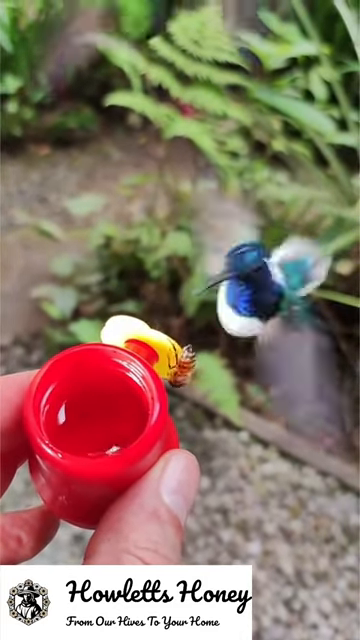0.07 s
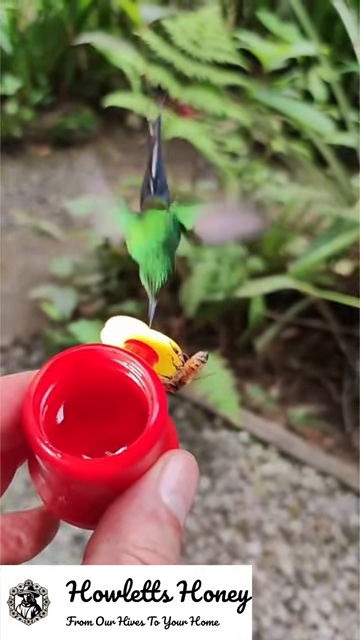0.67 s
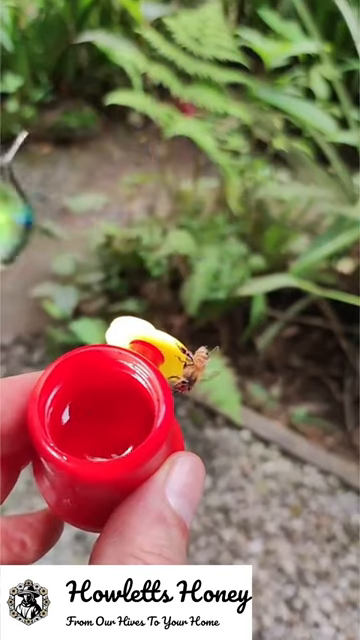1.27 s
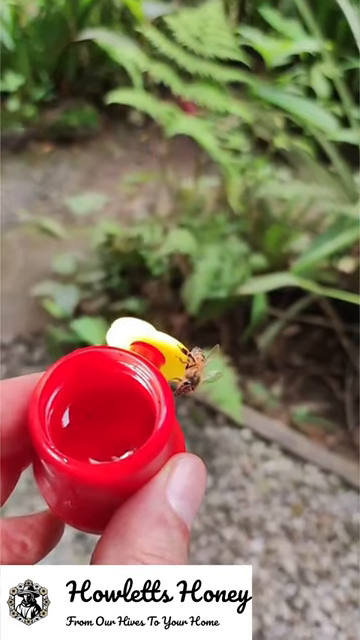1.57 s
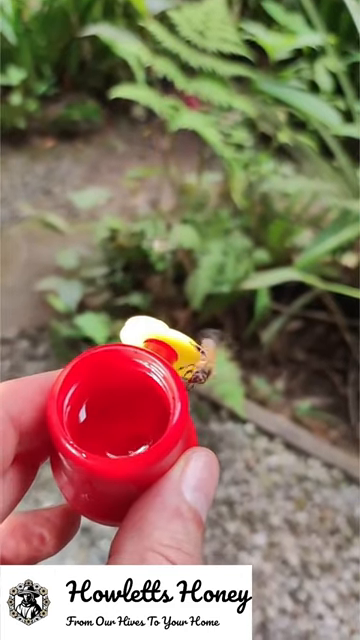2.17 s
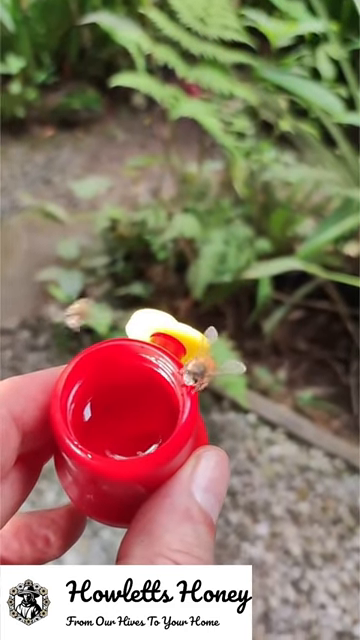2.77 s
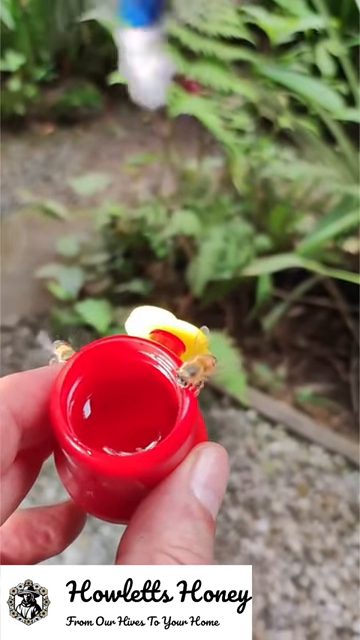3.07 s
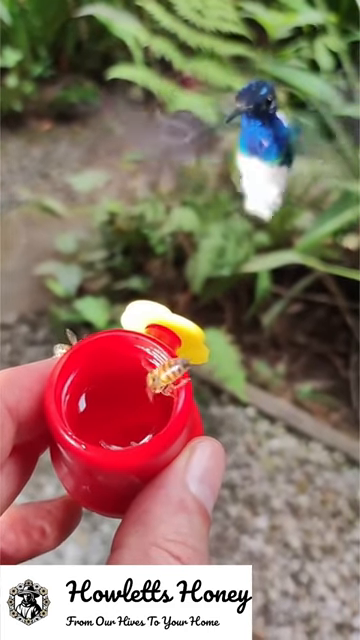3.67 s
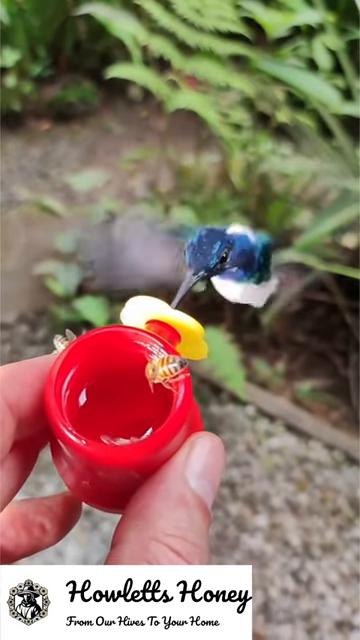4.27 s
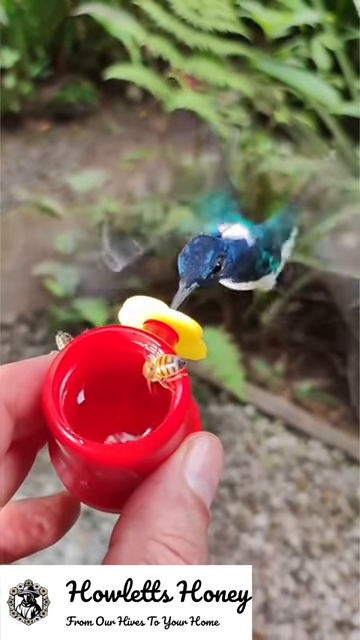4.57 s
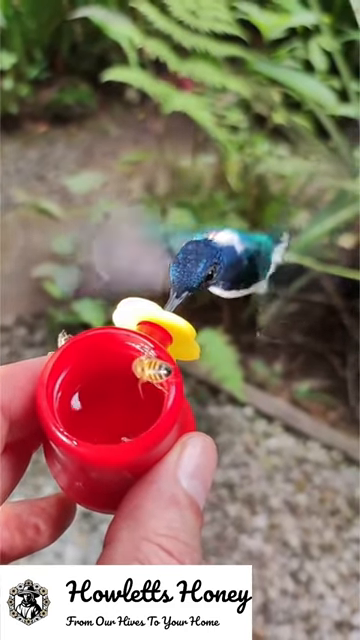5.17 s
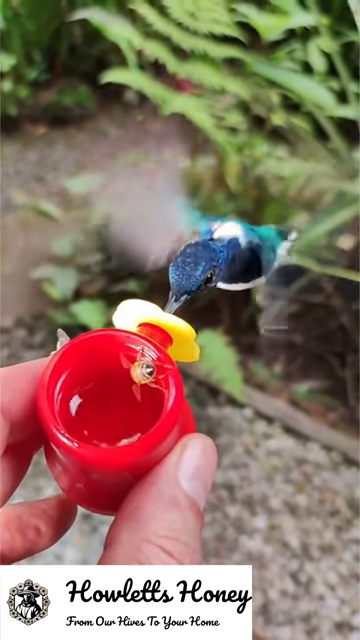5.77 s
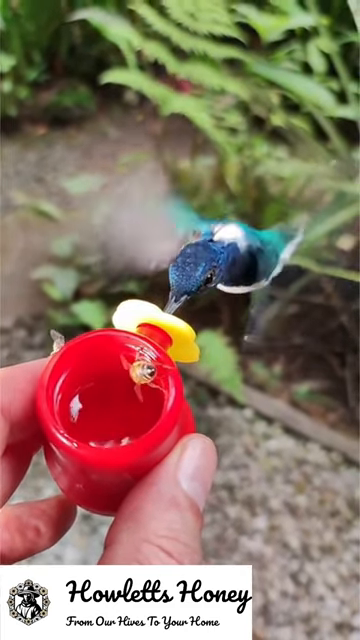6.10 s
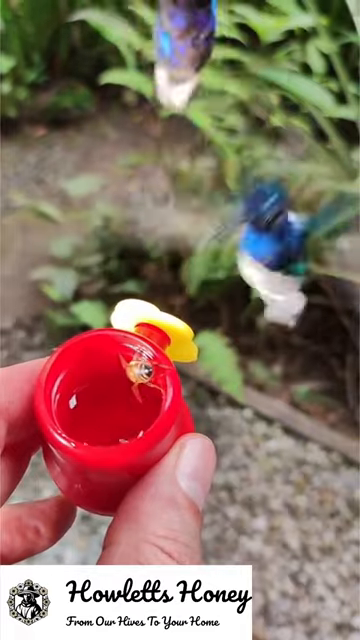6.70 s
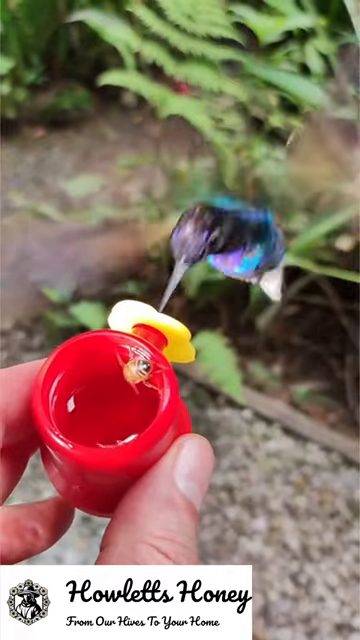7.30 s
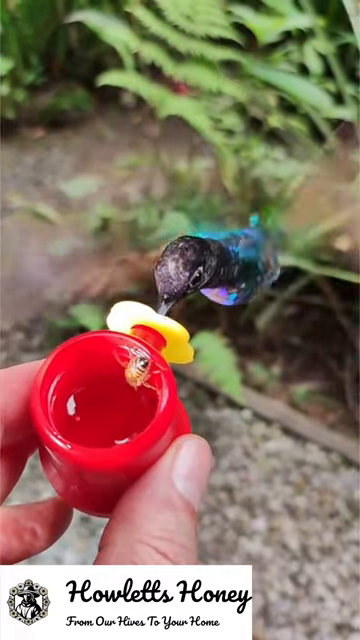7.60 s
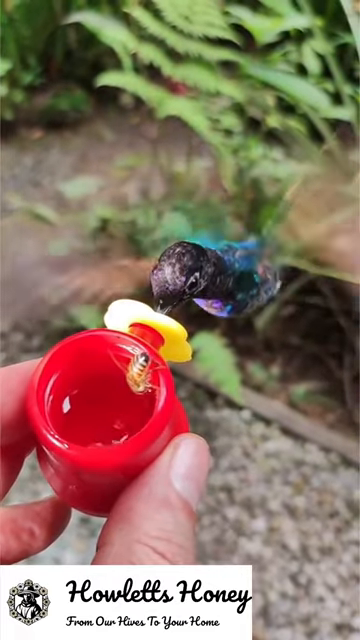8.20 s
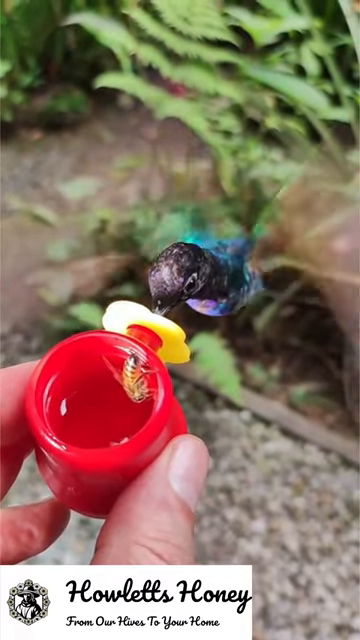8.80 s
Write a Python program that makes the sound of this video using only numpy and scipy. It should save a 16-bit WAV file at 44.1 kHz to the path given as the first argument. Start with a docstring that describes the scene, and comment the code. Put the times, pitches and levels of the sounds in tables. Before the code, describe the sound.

Hummingbirds hum and whir very close, with soft wing thumps, sharp high chips and a faint bee over steady garden noise.

```python
"""Hummingbirds hover in turn at a hand-held garden feeder, a hand's width from the microphone.
Their wing strokes hum and shed eddies; a close swerve throws vortices that thump. The birds chip,
squeak and hiss, feathers and bills snap and rustle, and light taps ring the plastic feeder.
A honeybee buzzes round it and far birds twitter and chatter over the steady wash of the garden.
Leaves and ground give a short echo."""
import sys
import numpy as np
from scipy import signal
from scipy.fft import rfft, irfft, next_fast_len
from scipy.io import wavfile
from scipy.ndimage import uniform_filter1d

SR = 44100
rng = np.random.default_rng(int(sys.argv[2]) if len(sys.argv) > 2 else 0)


def unload_audio(sound):
    """Save the sound as a 16-bit wav file, at the path given as the first command line argument."""
    columns = np.transpose(np.atleast_2d(sound))
    # keep every value between -1 and 1, then stretch to whole-number steps
    steps = np.round(np.clip(columns, -1, 1) * 32767)
    wavfile.write(sys.argv[1], SR, steps.astype(np.int16))


N = 399105
TIME = np.arange(N) / SR


def wings(strokes_hz, gain, harmonics, air_db, hum_gain, jitter, shimmer_db):
    """Unequal up and down strokes hum on the wingbeat. Returns hum and (eddy, swish) envelopes."""
    beat = 2 * np.pi * np.cumsum(strokes_hz / 2 * (1 + jitter * wander(40))) / SR
    hum = sum(amp(db + shimmer_db * wander(25)) * np.cos(k * beat) for k, db in harmonics)
    pulsing = 0.55 * np.cos(beat) + 0.5 * np.cos(2 * beat)
    eddy_db, swish_db = air_db
    stirred = gain * amp([eddy_db + 5.2 * pulsing, swish_db + 4.35 * pulsing])
    return hum_gain * np.sqrt(2) * gain * hum, stirred


HOVERS = [(0.0, 0.146, 75, -35), (0.46, 0.655, 73, -43), (0.927, 1.383, 74.5, -38.5),
          (3.067, 3.694, 66.5, -41.5), (3.74, 4.262, 65.7, -36), (4.316, 5.405, 71.3, -31.5),
          (5.417, 5.825, 70.6, -30), (5.874, 6.976, 72.5, -31.5)]  # arrival/s, departure/s, stroke rate/Hz (two per beat), level/dB
SMALL_HARMONICS = [(1, -38), (2, -0.5), (3, -10), (4, -17), (5, -19.5), (6, -32.5), (7, -30.5), (8, -31)]  # wingbeat multiple, level/dB
SMALL_PAN = [(0, 12), (2.5, 9), (3.6, 7), (4.3, 7), (6.5, 9), (7, 7)]  # t/s, left minus right/dB
HOVER_FADE_S, SWERVE_STROKE_HZ = 0.06, 74

def small_birds(swerving):
    """Small birds hover at a steady stroke rate; a swerve swells the hum and pulls it to its own rate."""
    gains = [amp(db) * gate([(start,), (end,)], HOVER_FADE_S) for start, end, _, db in HOVERS]
    power = np.square(gains + [amp(-28) * swerving]) + 1e-14
    rates_hz = [hz for _, _, hz, _ in HOVERS] + [SWERVE_STROKE_HZ]
    strokes_hz = np.dot(rates_hz, power) / power.sum(0)
    hum, stirred = wings(strokes_hz, np.sqrt(power.sum(0)), SMALL_HARMONICS, air_db=(-14, -20),
                         hum_gain=-0.73, jitter=0.005, shimmer_db=0.8)
    return pan(hum, curves(SMALL_PAN)[0]), stirred


LARGE_FLIGHT = [(7.03, 51.6, -41.5), (7.42, 53, -39.5), (7.58, 55, -41), (9.05, 54.4, -40.5)]  # t/s, stroke rate/Hz, level/dB
LARGE_HARMONICS = [(1, -9), (2, 5), (3, -1), (4, -14), (5, -7.5), (6, -11.5), (7, -12.5), (8, -16),
                   (9, -17), (10, -21)]  # wingbeat multiple, level/dB

def large_bird():
    """A large bird comes last; its slow strokes hum lower."""
    strokes_hz, db = curves(LARGE_FLIGHT)
    gain = amp(db) * gate(LARGE_FLIGHT, HOVER_FADE_S)
    hum, stirred = wings(strokes_hz, gain, LARGE_HARMONICS, air_db=(-11, -15.5),
                         hum_gain=0.84, jitter=0.02067, shimmer_db=2)
    return pan(hum, left_db=8.5), stirred


TINY_FLIGHT = [(0.0, 134, -45), (1.3, 114, -45), (2.15, 91, -45), (2.4, 140, -54), (3.0, 140, -51.5)]  # t/s, stroke rate/Hz, level/dB
TINY_HARMONICS = [(1, -1), (2, 2.5), (3, -8), (4, -19)]  # wingbeat multiple, level/dB

def tiny_bird():
    """A tiny bird hangs about early on; its fast, uneven strokes hum higher."""
    strokes_hz, db = curves(TINY_FLIGHT)
    gain = amp(db) * gate(TINY_FLIGHT, HOVER_FADE_S)
    return wings(strokes_hz, gain, TINY_HARMONICS, air_db=(2.5, -15),
                 hum_gain=1, jitter=0.052, shimmer_db=3)


EDDY_SPECTRUM = [(20, -19), (40, -19), (110, 8), (170, -6.5), (260, -3.5), (400, -12.5), (700, -26.5),
                 (1500, -69)]  # f/Hz, level/dB
SWISH_SPECTRUM = [(200, -5), (500, 6), (1200, 9), (2000, 4), (3100, 3.5), (4800, -1), (6500, -0.5),
                  (8200, 4.5), (10000, -5), (13000, -16.5)]  # f/Hz, level/dB

def draught(stirred, swerving):
    """Low eddies and feather swish puff in step with the strokes and swell in each swerve."""
    eddy_gain, swish_gain = np.sqrt(np.square(stirred).sum(0))
    eddies = noise(EDDY_SPECTRUM, patchy_db=-7.5) * np.hypot(eddy_gain, amp(-33) * swerving)
    swish = noise(SWISH_SPECTRUM, patchy_db=5.5) * np.hypot(swish_gain, amp(-35) * swerving)
    return eddies + swish


# first beat/s, last beat/s, level/dB, push/suck ratio, flick/dB, wake/dB re level
SWERVES = [(0.165, 0.297, -18, .8, -38.5, -13), (0.808, 0.864, -19, 0.56, -48, -13),
           (1.007, 1.06, -22, 1.1, -48, -14.5), (1.432, 1.459, -16.5, 0.7, -39, -10.5),
           (1.829, 1.908, -17, 0.64, -39.5, -12), (2.031, 2.199, -16.5, 0.65, -42, -19),
           (2.442, 2.548, -28.5, 1.1, -38, -22), (3.243, 3.363, -25.5, 1.3, -46, -26),
           (3.432, 3.463, -27, 1, -40, -22), (4.253, 4.388, -30, 0.42, -50, -20),
           (5.384, 5.512, -18.5, 0.42, -49, -14.5), (6.238, 6.288, -20, 0.55, -41, -14),
           (6.663, 6.737, -16, 0.65, -41, -15), (6.867, 7.035, -18, 0.28, -42.5, -14.5),
           (7.278, 7.345, -26, 1.2, -40.5, -17)]
FLICK_SPECTRUM = [(300, 12), (600, -1), (1200, 0), (2000, -3.5), (3000, 5), (4000, -3), (6000, -5.5),
                  (13000, -17)]  # f/Hz, level/dB
WAKE_SPECTRUM = [(60, -22), (140, 4.5), (200, 2.5), (380, -9), (600, -21), (1200, -57)]  # f/Hz, level/dB

def swerves():
    """Each hard beat throws a vortex: soft push, feather flick, sudden suck, slow refill, rough wake."""
    push_s, lead_s, flick_s = 0.0024, 0.0029, 0.0036
    suck_s, refill_s, wake_s = 0.0018, 0.0034, 0.0058
    thumps, flicks, wakes = np.zeros((3, N))
    for first, last, db, push_ratio, flick_db, wake_db in SWERVES:
        beats = round((last - first) * SWERVE_STROKE_HZ / 2) + 1
        for k, s in enumerate(np.linspace(first, last, beats)):
            near = around(s)
            t = (TIME[near] - s) * np.exp(0.15 * rng.standard_normal())  # random stretch per beat
            strength = np.sin(np.pi * (k + 0.5) / beats) ** 0.4
            push = push_ratio * np.exp(-((t + lead_s) / push_s) ** 2)
            suck = np.exp(-abs(t / np.where(t < 0, suck_s, refill_s)) ** 1.43)
            thumps[near] += amp(db) * strength * (push - suck)
            flicks[near] += amp(flick_db) * strength * np.exp(-((t + lead_s / 2) / flick_s) ** 2)
            wakes[near] += amp(db + wake_db) * strength * np.exp(-((t - wake_s / 2) / wake_s) ** 2)
    return thumps + flicks * noise(FLICK_SPECTRUM, patchy_db=2) + wakes * noise(WAKE_SPECTRUM)


def chip_tone(ms, half_ms, hz, fall_hz=1290):
    """A whistle and its octave. The pitch drops fall_hz per half length, so short chips are steepest."""
    phase = 2 * np.pi * ms / 1000 * (hz - fall_hz * ms / half_ms / 2)
    return np.exp(-(ms / half_ms) ** 2) * (np.cos(phase) + amp(-12) * np.cos(2 * phase))


# t/s, level/dB, half length/ms, centre f/Hz, hoarse edge/dB re level, echo send/dB
CHIPS = [(0.162, -28.5, 3.7, 8650, -18, -6), (0.7845, -11, 0.99, 8300, -13.5, -14),
         (0.7864, -16.5, 0.53, 6660, -9.5, -10), (1.137, -34, 2, 7670, -13, 1.5),
         (1.748, -41, 5.4, 7500, -23, 5), (1.8638, -9, 0.89, 8700, -11.5, -13.5),
         (2.893, -32, 1.5, 8240, -17, 1.5), (3.1629, -14.5, 1.24, 8240, -17, -7),
         (4.1574, -39.5, 2.2, 8200, -14, -1), (6.339, -38.5, 2.8, 8300, -17, 3),
         (6.6283, -12, 0.99, 8260, -22, -10.5)]
HOARSE_SPECTRUM = [(2000, -32), (3800, -9.5), (5000, -9), (6500, -13), (9000, -2.5), (11000, 6), (12400, 2),
                   (14000, -18)]  # f/Hz, level/dB

def chips(edge_rise_ms=3.0, edge_decay_ms=2.1):
    """Falling whistles with a hoarse edge. Returns direct sound and echo send, more for a far bird."""
    direct, send = np.zeros((2, 2, N))
    hoarse = noise(HOARSE_SPECTRUM, patchy_db=1)
    for s, db, half_ms, hz, edge_db, send_db in CHIPS:
        near = around(s)
        ms = 1000 * (TIME[near] - s)
        edge = amp(edge_db) * np.exp(np.minimum(ms / edge_rise_ms, -ms / edge_decay_ms))
        call = amp(db) * (chip_tone(ms, half_ms, hz) + edge * hoarse[:, near])
        direct[:, near] += call
        send[:, near] += amp(send_db) * call
    return direct, send


SQUEAKS = [
    [(3.801, 7270, -49), (3.811, 8250, -34.5), (3.822, 8250, -32.5), (3.836, 8430, -44), (3.841, 8200, -56)],
    [(6.731, 4940, -55), (6.75, 5910, -46), (6.768, 6950, -48), (6.779, 7700, -38), (6.792, 7980, -36.5),
     (6.804, 8230, -33.5), (6.813, 8500, -52)],
    [(8.814, 4710, -49), (8.83, 5770, -44.5), (8.852, 6390, -44.5), (8.863, 6900, -40),
     (8.874, 7740, -37.5), (8.881, 8300, -46)],
    [(8.863, 7250, -30.5), (8.866, 8370, -37), (8.872, 9600, -50), (8.877, 9600, -50)],
]  # one list per voice, the last two overlap: t/s, f/Hz, level/dB
RASP_DB = [-18, -6, -9, -9]  # per voice: rasp/dB re tone

def squeaks():
    """Thin, trembling whistles that swell as they rise, with a rasp just under the pitch."""
    out = np.zeros(N)
    for contour, rasp_db in zip(SQUEAKS, RASP_DB):
        hz, db = curves(contour)
        tone = np.sin(wavering_phase(hz, depth=0.02, rate_hz=1500))
        rasp = np.sin(wavering_phase(0.92 * hz, depth=0.088, rate_hz=2000))
        out += np.sqrt(2) * amp(db) * gate(contour, 0.0014) * (tone + amp(rasp_db) * rasp)
    return out


HISSES = [(0.1, -43, 0.048), (0.25, -39.5, 0.049), (0.45, -42.5, 0.071), (0.605, -42, 0.044),
          (0.705, -42.5, 0.034), (0.9, -40.5, 0.11), (1.17, -50.5, 0.066), (1.41, -48.5, 0.091),
          (1.985, -39, 0.03), (2.1, -43, 0.063), (2.27, -40.5, 0.052), (2.91, -48, 0.021),
          (3.12, -51, 0.085), (3.44, -49, 0.024), (5.07, -43.5, 0.03), (5.99, -48, 0.05), (7.32, -50, 0.11),
          (7.55, -46.5, 0.039)]  # centre t/s, level/dB, half length/s
HISS_SPECTRUM = [(1060, -59), (1800, -3), (3060, 4.5), (3530, 2), (4330, 0), (5400, 1.5), (6800, 2.5),
                 (8070, 8), (9450, -8), (9900, -1), (11800, -7), (13500, -51)]  # f/Hz, level/dB

def hisses(chips_per_s=110, kinds=24):
    """Scolding from the bushes: breathy noise sputtering with tiny chips of scattered pitch."""
    ms = np.arange(-300, 300) * 1000 / SR
    sputter = np.zeros(N)
    for pitch, length in rng.standard_normal((kinds, 2)):
        onsets = (rng.random(N) < chips_per_s / kinds / SR).astype(float)
        chip = chip_tone(ms, half_ms=2.45 * 2 ** (length / 2), hz=8130 + 444 * pitch)
        sputter += signal.oaconvolve(onsets, chip, "same")
    sputter = unit(echo(sputter[None]) + 0.5 * sputter)
    breath = noise(HISS_SPECTRUM, patchy_db=4) * amp(1.9 * wander(120))
    faint = amp(-62 + 3.5 * wander(9))  # fainter hisses come and go by chance
    return (0.632 * breath + 0.69 * sputter) * np.hypot(swells(HISSES), faint)


SNAPS = [(0.267, -29, 0.0089, 0.46), (0.512, -35.5, 0.005, 0.2), (1.428, -35.5, 0.0029, 0.93),
         (1.99, -32.5, 0.0025, 0.3), (2.8436, -28.5, 0.0025, 0.88), (4.271, -32, 0.0034, 0.52),
         (6.9128, -17.5, 0.0029, 0.84), (7.003, -32, 0.0016, 1), (8.085, -28, 0.0013, 0.56)]  # t/s, level/dB, decay/s, brightness 0-1
KNOCK_SPECTRUM = [(150, 9), (550, 4), (1100, 0.5), (1900, -0.5), (2900, 0), (4200, -6.5), (6000, -14),
                  (13000, -43)]  # f/Hz, level/dB
SNAP_SPECTRUM = [(150, -25), (500, 3), (2000, 4.5), (3300, 8.5), (5000, 2.5), (8200, 13), (10500, 8),
                 (13000, -1)]  # f/Hz, level/dB

def snaps():
    """Feathers and bills snap: dry bursts that blend dull and bright noise."""
    dull, bright = np.zeros((2, N))
    for s, db, decay_s, brightness in SNAPS:
        burst = amp(db) * np.exp(-TIME[:SR // 4] / decay_s)
        dull[int(s * SR):][:len(burst)] += (1 - brightness) * burst
        bright[int(s * SR):][:len(burst)] += brightness * burst
    return dull * noise(KNOCK_SPECTRUM) + bright * noise(SNAP_SPECTRUM)


RUSTLES = [(0.115, -48.5, 0.032), (0.23, -42, 0.03), (3.3, -50.5, 0.089), (7.1, -40, 0.05),
           (7.285, -51, 0.023)]  # centre t/s, level/dB, half length/s

def rustles():
    """Feathers brush as birds jostle: flickering swells of dull noise."""
    return noise(KNOCK_SPECTRUM, patchy_db=7.5) * swells(RUSTLES) * amp(4.7 * wander(220))


TAPS = [(0.046, -30, 2870), (0.054, -33, 4000), (0.074, -33, 2580), (0.513, -28, 520), (1.991, -27, 700),
        (2.467, -21.5, 2860), (2.521, -35, 2900), (7.258, -28, 1540), (8.085, -28.5, 2700)]  # t/s, level/dB, f/Hz

def taps(decay_s=0.0013):
    """Each light tap briefly rings one spot of the plastic feeder."""
    out, t = np.zeros(N), TIME[:SR // 20]
    for s, db, hz in TAPS:
        out[int(s * SR):][:len(t)] += amp(db) * np.exp(-t / decay_s) * np.sin(2 * np.pi * hz * t)
    return out


BEE_FLIGHT = [(2.28, 250, -55), (2.45, 236, -52.5), (2.66, 238, -61), (2.82, 242, -54.5), (2.97, 238, -58),
              (3.08, 247, -54), (3.28, 243, -54), (3.65, 247, -65)]  # t/s, wingbeat/Hz, level/dB
BEE_HARMONICS = [(1, -10), (2, -3.5), (3, -14), (4, -15), (5, -13.5), (6, -32)]  # wingbeat multiple, level/dB

def bee():
    """A honeybee's wings make a wavering buzz, second harmonic strongest."""
    hz, db = curves(BEE_FLIGHT)
    beat = wavering_phase(hz, depth=0.009, rate_hz=45)
    buzz = sum(amp(harmonic_db) * np.sin(k * beat) for k, harmonic_db in BEE_HARMONICS)
    return np.sqrt(2) * amp(db + 1.9 * wander(23.8)) * gate(BEE_FLIGHT, 0.066) * buzz


TWITTERS = [(0.156, -44, 0.014, 4690, 4010, 0.047), (0.27, -41.5, 0.016, 5190, 4870, 0.068),
            (0.298, -47.5, 0.03, 3150, 2740, 0.057), (0.409, -47, 0.052, 2255, 3790, 0.054),
            (1.967, -51, 0.1, 3690, 3150, .025), (2.034, -43, 0.016, 5540, 5040, .06),
            (3.128, -48, 0.028, 2934, 2105, .04), (7.808, -42.5, 0.044, 3590, 3634, .02),
            (7.838, -51.5, 0.036, 3560, 2690, 0.027)]  # t/s, level/dB, length/s, start f/Hz, end f/Hz, waver/pitch ratio

def twitters():
    """Farther birds sing short sliding notes; a fast waver makes some hoarse."""
    hz, level, waver = np.full(N, 3000.), np.zeros(N), np.zeros(N)
    for s, db, length_s, start_hz, end_hz, depth in TWITTERS:
        note = (TIME >= s) & (TIME < s + length_s)
        progress = (TIME[note] - s) / length_s
        hz[note] = start_hz + (end_hz - start_hz) * progress
        level[note] = amp(db) * np.sin(np.pi * progress)
        waver[note] = depth
    tone = np.sin(wavering_phase(hz, waver, rate_hz=800))
    return np.sqrt(2) * uniform_filter1d(level, size=90) * tone


CHATTER = [(3.11, -47, 0.071), (4.47, -53, 0.13), (4.65, -55, 0.043), (5.25, -47, 0.021),
           (7.855, -47, 0.02), (8.13, -53, 0.023), (8.34, -53, 0.14)]  # centre t/s, level/dB, half length/s
CHATTER_SPECTRUM = [(1800, -10), (2750, -6), (3300, -0.5), (3620, 1), (4000, -11), (6000, -26)]  # f/Hz, level/dB

def chatter():
    """Far birds rasp: swells of band noise with a fast flutter."""
    rasp = noise(CHATTER_SPECTRUM, patchy_db=4.5) * amp(2.9 * wander(150))
    return pan(rasp * swells(CHATTER), left_db=-0.5)


GARDEN_SPECTRUM = [(20, -17.5), (40, 1.5), (80, -7), (150, -5.5), (300, -21), (500, -22.5), (800, -28.5),
                   (2000, -29), (3300, -29.5), (4600, -32), (6500, -36), (8100, -28.5), (10000, -37),
                   (12300, -37), (13500, -136)]  # f/Hz, level/dB

def garden():
    """A steady wash, strongest in the bass."""
    return amp(-41.5) * noise(GARDEN_SPECTRUM, patchy_db=3)


ECHO_DECAY = [(3000, 0.63), (8000, 0.66), (13000, 0.028)]  # f/Hz, T60/s

def echo(x):
    """Leaves and ground scatter a sound: sparse reflections that die fastest in the top treble."""
    reflections = rng.standard_normal((2, SR // 2)) * (rng.random((2, SR // 2)) < 0.1)
    hz, t, bins = signal.stft(reflections, SR, nperseg=256)
    decay = amp(-60 * t / at_hz(ECHO_DECAY, hz)[:, None])
    tail = signal.istft(bins * decay, SR, nperseg=256)[1]
    tail *= 1 + 4.4 * np.exp(-TIME[:tail.shape[1]] / 0.016)  # hand and feeder answer first
    return signal.fftconvolve(x, tail / np.linalg.norm(tail[0]), axes=1)[:, :N]


COHERENCE = [(40, 0.54), (250, 0.76), (600, 0.86), (1300, 0.72), (2800, 0.031), (9000, 0.24), (12000, 0.26)]  # f/Hz, left-right coherence 0-1

def noise(spectrum, patchy_db=0):
    """Stereo coloured noise of unit rms, with drifting patches mainly in the treble."""
    frames, hz = N // 512 + 5, np.fft.rfftfreq(2048, 1 / SR)
    a, b, c, d, patches = rng.standard_normal((5, frames, len(hz)))
    patches = unit(uniform_filter1d(uniform_filter1d(patches, size=5, axis=0), size=25, axis=1))
    coherence = at_hz(COHERENCE, hz)
    left = a + 1j * b
    right = coherence * left + np.sqrt(1 - coherence ** 2) * (c + 1j * d)
    bins = np.array([left, right]) * amp(at_hz(spectrum, hz) + patchy_db * patches * hz / (hz + 700))
    return unit(signal.istft(bins.swapaxes(1, 2), nperseg=2048, noverlap=1536)[1][:, :N])


def amp(db):
    """Decibels to gain."""
    return 10 ** (np.asarray(db) / 20)


def unit(x):
    """Scales to unit rms."""
    return x / np.sqrt(np.mean(x ** 2) + 1e-20)


def at_hz(points, hz):
    """Reads a table on a log-frequency axis."""
    f, value = np.transpose(points)
    return np.interp(np.log(hz + 1), np.log(f + 1), value)


def curves(rows):
    """Each column of a time table, per sample."""
    s, *columns = np.transpose(rows)
    return [np.interp(TIME, s, column) for column in columns]


def gate(rows, fade_s):
    """One while a time table lasts, with soft ends."""
    return np.clip(np.minimum(TIME - rows[0][0], rows[-1][0] - TIME) / fade_s + 1, 0, 1)


def around(s):
    """The samples within 20 ms of a time."""
    return slice(int((s - 0.02) * SR), int((s + 0.02) * SR))


def swells(rows):
    """A bell curve per row of centre t/s, level/dB, half length/s."""
    t = TIME[::64]
    bells = sum(amp(db) * np.exp(-0.5 * ((t - s) / (0.84 * half_s)) ** 2) for s, db, half_s in rows)
    return np.interp(TIME, t, bells)


def wander(rate_hz):
    """Random drift of unit rms."""
    knots = rng.standard_normal(20000)
    return unit(np.interp(TIME * rate_hz, np.arange(len(knots)), knots))


def wavering_phase(hz, depth, rate_hz):
    """Phase of a tone whose pitch drifts by the fraction depth."""
    return 2 * np.pi * np.cumsum(hz * (1 + depth * wander(rate_hz))) / SR


def pan(x, left_db):
    """Stereo with the left channel left_db above the right."""
    return x * amp(np.array([[1], [-1]]) * left_db / 2)


def scene():
    """Wings close by, calls and clicks with their echo, the bee and the garden."""
    swerving = swells([((first + last) / 2, db, 1.188 * (last - first) / 2)  # outlasts the hard beats
                       for first, last, db, *_ in SWERVES])
    hums, stirred = zip(small_birds(swerving), large_bird(), tiny_bird())
    air = draught(stirred, swerving) + swerves()
    chip, chip_send = chips()
    clicks = snaps() + taps()
    squeak = squeaks()
    twitter = pan(twitters(), left_db=-1)
    calls = chip + amp(-5) * pan(squeak, left_db=5.5) + amp(-0.5) * twitter
    echoes = echo(chip_send + amp(2) * pan(squeak, left_db=1.5) + twitter + amp(-4) * clicks)
    return sum(hums) + air + calls + clicks + echoes + hisses() + rustles() + bee() + chatter() + garden()


PORT_BALANCE = [(30, 2.5), (70, 3), (140, 1.5), (400, 2.5), (1200, 0), (2200, -3.5), (3300, -6),
                (4500, -2.5), (7200, 11.5), (9000, 13.5), (12000, -1.5), (14000, 3)]  # f/Hz, left minus right/dB
PORT_LAG_SAMPLES, CUTOFF_HZ = 7, 13500

def record(dry):
    """The two microphone ports ring differently and the right hears later; a low-pass follows."""
    size = next_fast_len(N + 8192)
    balance_db = at_hz(PORT_BALANCE, np.fft.rfftfreq(size, 1 / SR))
    left, right = irfft(pan(rfft(dry, size), balance_db), size)[:, :N]
    right = np.pad(right, (PORT_LAG_SAMPLES, 0))[:N]
    lowpass = signal.firwin(301, CUTOFF_HZ, window=("kaiser", 8), fs=SR)
    return signal.oaconvolve(np.array([left, right]), lowpass[None], "same")


dry = scene()
out = record(dry)
unload_audio(out)
```